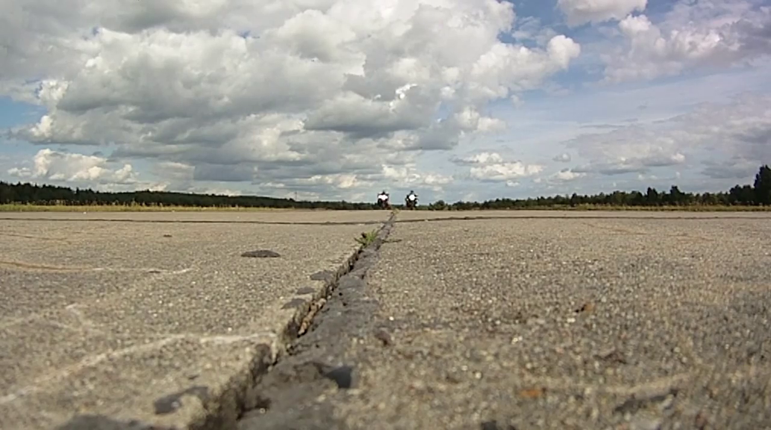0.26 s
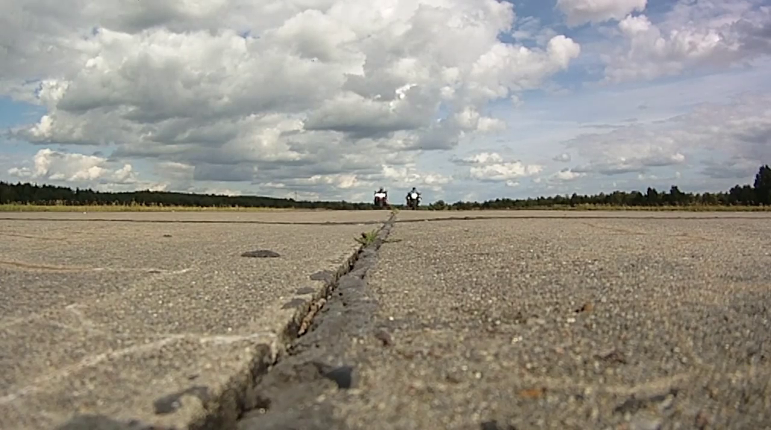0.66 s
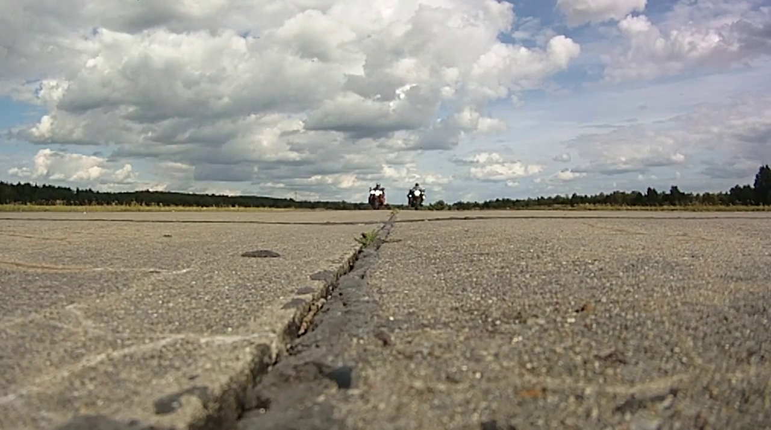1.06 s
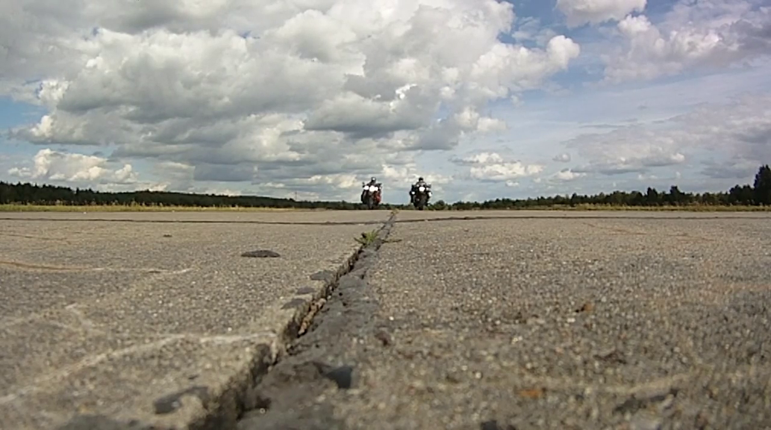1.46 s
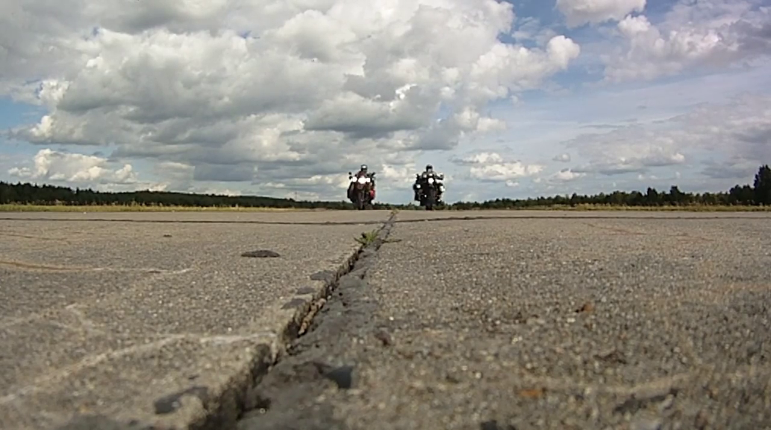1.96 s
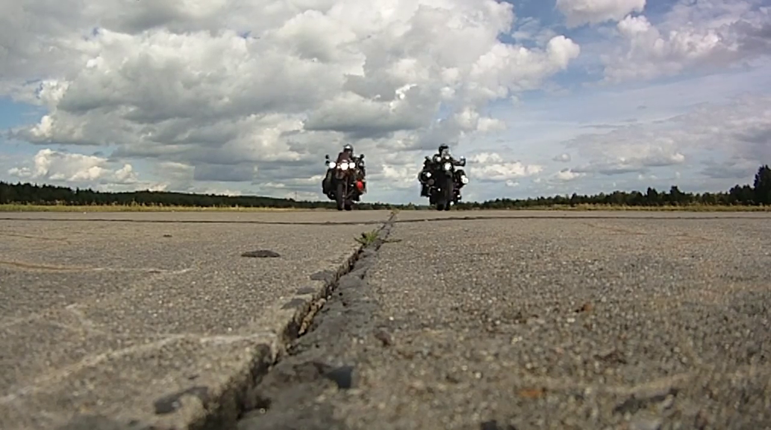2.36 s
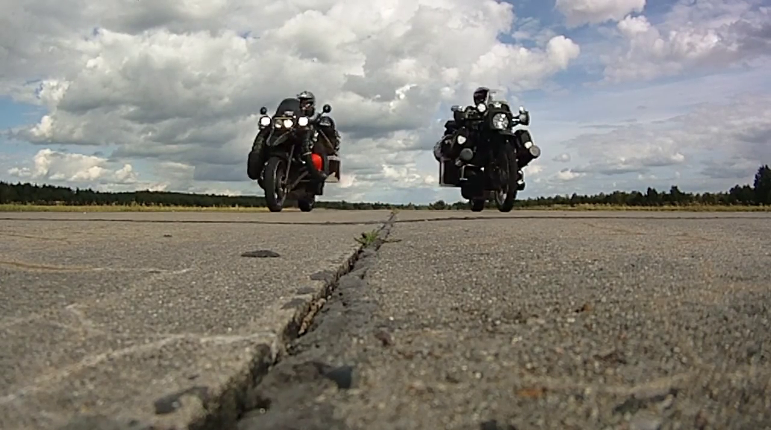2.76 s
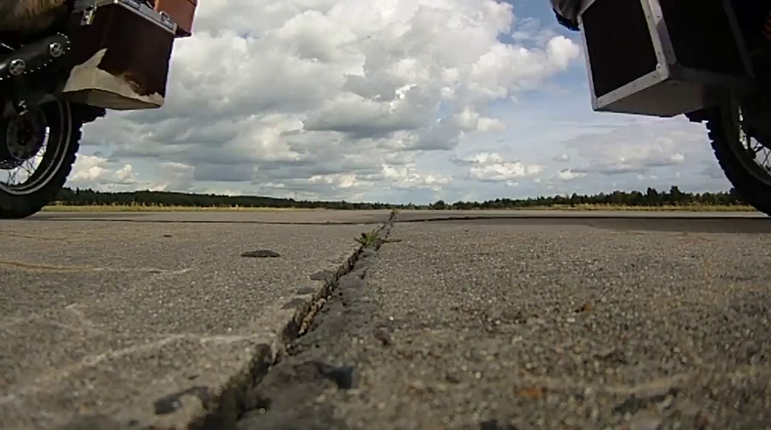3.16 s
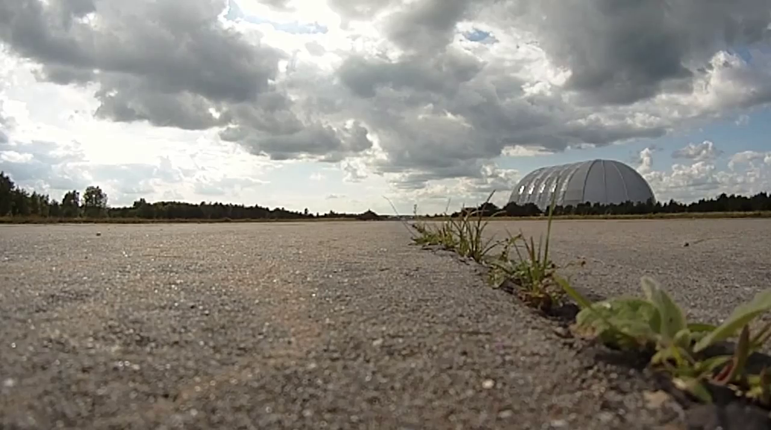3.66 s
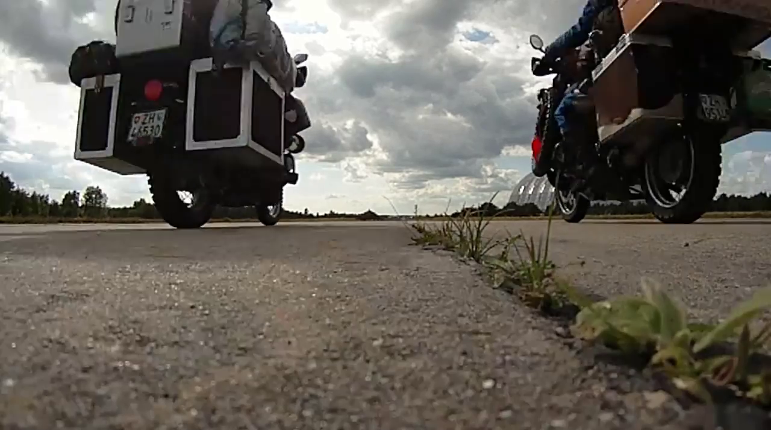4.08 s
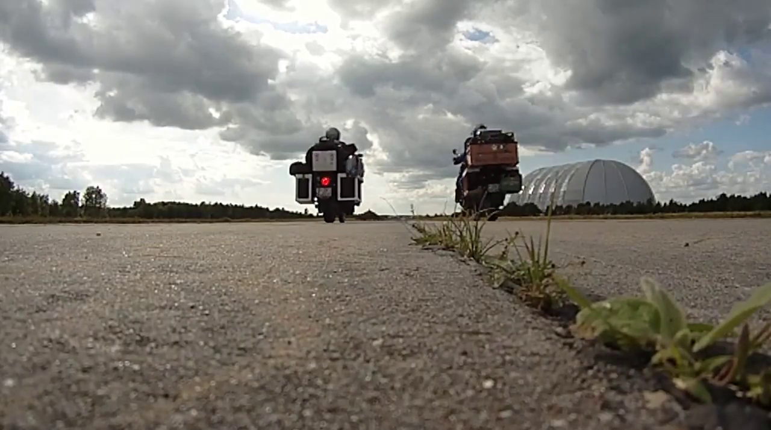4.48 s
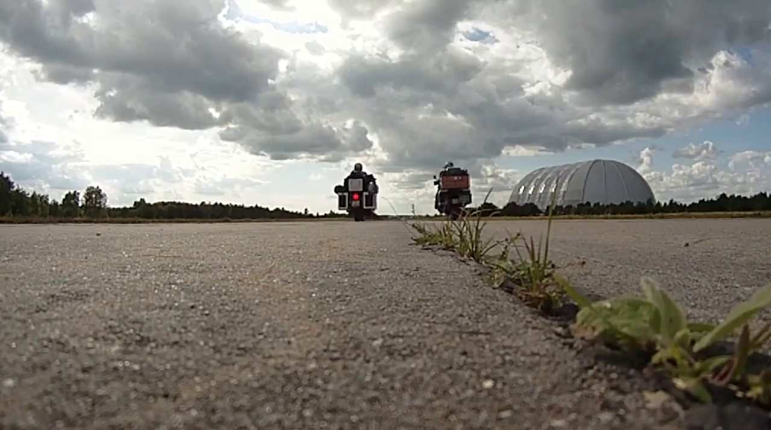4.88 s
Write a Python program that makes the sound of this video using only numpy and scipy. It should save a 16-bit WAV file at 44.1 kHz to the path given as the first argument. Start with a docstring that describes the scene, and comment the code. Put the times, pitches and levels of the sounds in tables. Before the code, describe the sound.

Dry open airfield, low microphone, almost mono. From 0 s two motorcycles hold a steady low hum, roughly 80 Hz at its strongest, slowly throbbing as the engines drift in and out of step, over dull tyre roar and soft wind rumble. Through 1-2.5 s it swells and brightens; tread rush, chain clatter and a few flicked stones emerge. Around 2.8-3.3 s the tyres sweep by with loud roar, crisp grit and falling pitch. At 3.5 s the tailpipes pass with hard exhaust beats that overload and duck the sound. At 3.63 s a small click and cut return to the close approach. The bikes pass again around 4.1 s, with wind gusts and side-to-side buffeting to 4.7 s. They recede lower in pitch with gas surges, raspy cracks, metallic chirps and irregular heavy pops, hardest near 4.7 s. A wavering gear whine rises from 4.8 s until the end, still riding away at 5.1 s.

```python
"""A beating engine hum and tyre roar swell up as two motorcycles ride in and pass the microphone.
After a cut the end of the approach comes again, facing the other way, and they ride off.
Distance sets level, dullness and Doppler shift; the two engines drift in and out of step, so their boom beats.
From the front: summed engine orders, noise for tyre roar, chain clatter and grit. From behind: gated exhaust
gas and blunt pressure beats, the hardest of which make a limiter duck."""
import sys
import numpy as np
from scipy import signal
from scipy.fft import rfft, irfft
from scipy.io import wavfile
from scipy.ndimage import uniform_filter1d

SR = 44100
rng = np.random.default_rng(int(sys.argv[2]) if len(sys.argv) > 2 else 0)


def materialize(psi):
    """Save the field psi as 16-bit PCM at rate SR to the path in sys.argv[1].

    A 1-D psi becomes a single channel; in a 2-D psi each row is a channel.
    """
    bounded = np.clip(np.atleast_2d(psi).T, -1, 1)
    quanta = np.round(bounded * 32767).astype(np.int16)
    wavfile.write(sys.argv[1], SR, quanta)


N = 225991
T = np.arange(N) / SR

# Throttle: time_s, leading engine rate_hz before Doppler
ENGINE_RATE = [(0, 39.4), (.7, 40.4), (2.1, 40.36), (3.05, 40.71), (3.52, 40.89), (4.48, 40.07),
               (4.58, 39.39), (4.95, 37.72), (5.12, 38.65)]
# Lag of the other engine: time_s, lag_cycles
ENGINE_SLIP = [(0, -1.52), (.41, -1.5), (.7, -1.44), (.94, -1.16), (1.47, -0.89), (1.69, -0.73),
               (2.39, -0.51), (2.8, -0.415), (3.1, -.25), (3.2, -0.29), (3.5, -0.035), (4.29, -0.026),
               (4.5, 0.52), (4.71, .74), (5.12, 1.54)]
# Low orders of both engines, close by: engine_order, leading_db, other_db,
# leading_change_alongside_db, other_change_alongside_db, roughness (0-1)
BOOM_ORDERS = [(2, -16.5, -15, -9, 1, 0.14), (3, -23, -26, 3.5, -4, 0.16)]
# Remaining orders against the hum level: engine_order, front_db, behind_db
HUM_ORDERS = [(1, -8, -24), (2.5, -9.5, -12), (4, -11.5, -8), (5, -0.5, 2.5), (6, -9.5, -8.5), (7, -2, -13),
              (8, -8.5, -19.5), (9, -14, -17), (10, -16, -11.5), (11, -22, -32)]
# Hardest exhaust beats, ahead of the limiter: time_s, spike_db
EXHAUST_BEATS = [(3.498, 9), (3.547, 8.5), (3.624, -4.5), (4.135, 4), (4.185, 6.5), (4.278, -4),
                 (4.329, 10), (4.417, 9.5), (4.492, 8.5), (4.513, -3), (4.676, 18.5), (4.806, 9.5),
                 (4.863, 11.5), (4.938, 6.5), (4.994, 10), (5.05, 11), (5.101, 14)]
# Surges and lulls of exhaust gas: time_s, half_length_s, change_db
GAS_SURGES = [(3.574, 0.069, 0.5), (4.272, 0.24, -3), (4.405, 0.031, 7), (4.592, 0.029, 6),
              (4.74, 0.075, 4), (4.96, 0.18, 2.5)]
# Click at the cut (the row at 3.63 s); every other row is a stone flicked by the tyres:
# start_s, level_db before the tick trim
BRIGHT_TICKS = [(2.798, -30), (2.895, -24), (2.942, -37), (2.99, -43), (3.04, -43), (3.63, -29),
                (3.699, -25)]
# Metal chirps from the bikes: centre_s, pitch_hz, peak_db
METAL_CHIRPS = [(3.608, 3720, -32), (4.122, 3700, -41), (4.271, 3700, -30.5), (4.375, 3760, -36.5),
                (4.481, 3760, -36), (4.58, 2700, -36), (4.606, 2630, -33), (4.749, 4220, -50),
                (4.857, 3890, -34), (4.924, 2740, -30.5), (4.988, 4200, -40), (5.016, 2520, -32)]
# Gear whine as they pull away: time_s, centre pitch_hz, centre level_db
GEAR_WHINE = [(4.55, 660, -60), (4.8, 685, -35), (4.92, 716, -25.5), (5.03, 738, -25.5), (5.12, 776, -27)]
# Gliding tones before the pitch ratio: pitch_hz, width_hz, relative level_db
GLIDING_TONES = [(995, 41, 4), (1171, 25, 3.5), (1282, 130, 3.5)]
# Gusts on the microphone: time_s, half_length_s, rumble_db, left_right_buffet_db
WIND_GUSTS = [(1.436, 0.48, -30.5, -88), (3.178, 0.046, -29, -77), (3.524, 0.02, -39, -38),
              (3.83, 0.055, -19, -65), (4.3, 0.067, -22, -27), (4.515, 0.045, -12.5, -37),
              (4.647, 0.03, -14, -27)]

# Noise colours, each scaled to rms 1 before its level: frequency_hz, density_db (per Hz)
# Low tyre roar: frequency_hz, density_db
ROAR_COLOUR = [(130, -9), (200, -7.5), (290, -7.5), (430, -11), (530, -6), (680, -13), (850, -21)]
# Bright rush of the tread: frequency_hz, density_db
RUSH_COLOUR = [(600, -2.5), (800, -1), (1000, -1), (1340, -1.5), (1560, -12), (1800, -12.5)]
# Chain clatter from ahead: frequency_hz, density_db
CLATTER_COLOUR = [(1500, -3.5), (1900, -6), (2400, -1.5), (3100, -13), (3700, -11), (4600, -25),
                  (5400, -54)]
# Chain clatter abreast and after the cut: frequency_hz, density_db
CLATTER_ABREAST_COLOUR = [(1500, 1.5), (1800, -7.5), (2500, -1.5), (3000, -8), (3600, -18), (4750, -12.5),
                          (5600, -27)]
# Grit under the tyres from ahead: frequency_hz, density_db
GRIT_COLOUR = [(4700, -3.5), (5700, -16), (6700, -4.5), (7300, -9), (8200, -3), (9100, -13.5),
               (10700, -5.5), (12100, -13), (14300, -7), (15500, -7.5)]
# Grit abreast and after the cut: frequency_hz, density_db
GRIT_ABREAST_COLOUR = [(5000, -11), (6300, -3), (8100, -2), (8900, -2.5), (10200, 0.5), (11200, -2.5),
                       (12800, -8), (15500, -13)]
# Body of the exhaust gas: frequency_hz, density_db
GAS_COLOUR = [(220, -3), (300, -4.5), (400, -4), (590, -10), (760, -10.5), (940, -12), (1300, -20.5),
              (1800, -32)]
# Rasp of the exhaust: frequency_hz, density_db
RASP_COLOUR = [(1900, 1), (2600, 4.5), (3100, -2), (3800, -1.5), (4800, -14.5), (5400, -7), (6400, -13.5),
               (8200, -6.5), (9200, -16.5), (14000, -13), (15500, -17)]
# Wind rumble shared by both channels: frequency_hz, density_db
AIR_COLOUR = [(25, -20), (37, 1), (48, -7), (70, -4), (120, -12), (200, -12.5), (400, -64)]
# Wind buffeting opposed in the two channels: frequency_hz, density_db
BUFFET_COLOUR = [(35, 2), (80, 12.5), (300, -9), (1000, -20), (3000, -28.5), (14000, -38.5)]
# Microphone hiss with a narrow peak: frequency_hz, density_db
HISS_COLOUR = [(1000, -13), (5000, 1.5), (7700, 0), (7890, 14), (8080, 0), (12000, -1.5), (14500, 0),
               (15500, -27)]

SPEED_M_S, PASS_S, ASIDE_M = 16.5, 3.45, 2.438  # PASS_S: tailpipes go by, in ride time
CUT_S, REPLAY_S = 3.63, .638  # the cut steps the ride back by REPLAY_S
FIRING_S = 3.547  # one firing of the leading engine
TYRES_AHEAD_M = 2.9  # tyres come abreast before the tailpipes
TYRES_SWING_M, PIPES_SWING_M = 1.4, 0.64  # stretch over which each turns past
TYRES_FADE_M = 0.65  # stretch over which the tyres fade once past
NEAR_M, NEAR_KNEE = 13.45, 8.2  # loudness levels off inside this range, this abruptly

ENGINE_LOSS_DB_PER_M = 0.0557
HUM_DB, HUM_FADE_DB_PER_M = -21, 0.62  # reference level; extra fading as they ride off
ROAR_DB, ROAR_LOSS_DB_PER_M = -21.5, 0.0655
RUSH_DB, RUSH_LOSS_DB_PER_M, RUSH_SHADE_DB = -21, 0.26, -2.5  # shade: behind the microphone
CLATTER_DB, CLATTER_LOSS_DB_PER_M = -32.5, 0.39
GRIT_DB, GRIT_REACH_M, GRIT_SHADE_DB = -42, 11.7, -7
GLIDE_START, GLIDE_SINK = .98, .22  # pitch ratio of the gliding tones, and its fall as the bikes go by
GAS_DB, RASP_DB = -20.5, -42
BREEZE_DB, WAKE_DB, WAKE_BUFFET_DB = -36, -29.5, -48.5
WHINE_ROUGH_DB = 3.5
FADE_IN_S = .015
ATTACK_S, RELEASE_S, TOP_HZ = .0003, 0.022, 15650  # limiter times, top of the passband


def undb(db):
    """Decibels to gain."""
    return 10 ** (np.asarray(db) / 20)


def unit(x):
    """Scale to rms 1."""
    return x / np.sqrt(np.mean(x ** 2))


def walk(rate_hz):
    """Smooth random drift of rms 1, from noise rolled off around rate_hz."""
    f = np.fft.rfftfreq(N, 1 / SR)
    return unit(irfft(rfft(rng.standard_normal(N)) * np.exp(-(f / rate_hz) ** 2), N))


def complex_walk(rate_hz):
    """Drift in both size and phase."""
    return walk(rate_hz) + 1j * walk(rate_hz)


def noise(spectrum, gate=1):
    """Optionally gated white noise, coloured with steep skirts outside the spectrum; rms 1."""
    hz, db = np.transpose(spectrum)
    f = np.fft.rfftfreq(N, 1 / SR) + 1
    skirts = np.minimum(1, np.minimum(f / hz[0], hz[-1] / f)) ** 6
    gain = undb(np.interp(np.log(f), np.log(hz), db)) * skirts
    return unit(irfft(rfft(rng.standard_normal(N) * gate) * gain, N))


def bump(s, half_s):
    """A bell-shaped swell around a moment."""
    return np.exp(-((T - s) / half_s) ** 2)


def ride_time(s):
    """Time along the ride, which steps back at the cut."""
    return s - REPLAY_S * (s > CUT_S)


def splice(control):
    """Soften the step of a control at the cut."""
    return uniform_filter1d(control, size=441)


def after_cut():
    """0 before the cut, 1 after it, when the microphone faces the other way."""
    return splice(1. * (T > CUT_S))


def curves(table):
    """Each column as a control along the ride; the stretch before the cut plays twice."""
    s, *columns = np.transpose(table)
    return [splice(np.interp(ride_time(T), ride_time(s), c)) for c in columns]


def gone_by(along, swing_m):
    """Near 0 before a point is reached, near 1 after it."""
    return .5 + .5 * np.tanh(along / (2 * swing_m))


def spreading(distance):
    """Gain of 1 / distance that levels off close by."""
    return (1 + (distance / NEAR_M) ** NEAR_KNEE) ** (-1 / NEAR_KNEE)


def wind(behind):
    """Breeze, wake of the bikes and gusts: shared rumble, and buffeting opposed left and right."""
    rumble = undb(BREEZE_DB) + undb(WAKE_DB) * behind
    buffet = undb(WAKE_BUFFET_DB) * behind + undb(-71.5)
    for s, half_s, rumble_db, buffet_db in WIND_GUSTS:
        rumble = rumble + undb(rumble_db) * bump(s, half_s)
        buffet = buffet + undb(buffet_db) * bump(s, half_s)
    return noise(AIR_COLOUR) * rumble, noise(BUFFET_COLOUR) * buffet


def small_parts():
    """Stones and the click at the cut as decaying bright noise, metal as short narrow chirps."""
    tick_s, tick_trim_db, chirp_s, chirp_width_hz = 0.0024, -10, 0.0041, 260
    ticks = sum(undb(db) * (T >= s) * np.exp(-abs(T - s) / tick_s) for s, db in BRIGHT_TICKS)
    bright = noise([(7000, -8), (9000, 3), (14000, 0), (16000, -2)])
    out = undb(tick_trim_db) * ticks * bright
    waver = walk(chirp_width_hz)
    for s, hz, db in METAL_CHIRPS:
        out = out + undb(db) * bump(s, chirp_s) * np.sin(2 * np.pi * hz * T + waver)
    return out


def gears():
    """Gear whine: a rising tone and its octave, wavering in pitch and rough in level."""
    octave_db, waver = -11, 0.0019  # waver: share of the pitch
    hz, db = curves(GEAR_WHINE)
    phase = 2 * np.pi * np.cumsum(hz * (1 + waver * walk(45))) / SR
    level = np.sqrt(2) * undb(db + WHINE_ROUGH_DB * walk(36)) * (T > GEAR_WHINE[0][0])
    return level * (np.sin(phase) + undb(octave_db) * np.sin(2 * phase))


def gliding_tones(swing):
    """Narrow drifting tones that sink in pitch as the bikes go by; rms 1."""
    travel = np.cumsum(GLIDE_START - GLIDE_SINK * swing) / SR
    tones = 0
    for hz, width_hz, db in GLIDING_TONES:
        carrier = np.exp(2j * np.pi * hz * travel)
        tones = tones + undb(db) * np.real(complex_walk(width_hz) * carrier)
    return unit(tones)


def tyres(turns, along, distance):
    """Front view: roar, tread rush and clatter pulsing with the engine, and crunching grit."""
    knock, glide_db, grain_db, grit_falloff = 0.12, -5, 4, 5.0
    swing, turned = gone_by(along + TYRES_AHEAD_M, TYRES_SWING_M), after_cut()
    knocks = np.cos(2 * np.pi * 5 * turns) + .7 * np.cos(2 * np.pi * 2.5 * turns)
    gate = np.exp(knock * knocks)
    off_axis = abs(swing - turned)

    roar = noise(ROAR_COLOUR, gate) * undb(ROAR_DB - ROAR_LOSS_DB_PER_M * distance)
    rush_db = RUSH_DB - RUSH_LOSS_DB_PER_M * distance + RUSH_SHADE_DB * off_axis
    rush = noise(RUSH_COLOUR, gate) + undb(glide_db) * gliding_tones(swing) * gate
    rush = rush * undb(rush_db)

    # the treble changes colour as the angle to the microphone swings round
    abreast = np.clip((1 - turned) * swing + turned, 0, 1)
    ahead, beside = np.sqrt(1 - abreast), np.sqrt(abreast)
    rattle = gate * undb(1.44 * walk(38))
    clatter = ahead * noise(CLATTER_COLOUR, rattle) + beside * noise(CLATTER_ABREAST_COLOUR, rattle)
    clatter = clatter * undb(CLATTER_DB - CLATTER_LOSS_DB_PER_M * distance)

    crunch = undb(grain_db * walk(3000) + 1.2 * walk(44.3))
    grit = ahead * noise(GRIT_COLOUR, crunch) + beside * noise(GRIT_ABREAST_COLOUR, crunch)
    grit = grit * undb(GRIT_DB + GRIT_SHADE_DB * off_axis)
    grit_reach = 1 / np.hypot(1, (distance / GRIT_REACH_M) ** grit_falloff)
    return (roar + rush + clatter) * spreading(distance) + grit * grit_reach


def tailpipes(turns, slip, beats):
    """Rear view: gas noise in surges, cracking once a cycle for each engine and on the hard beats."""
    crack, sharpness, other_share, other_lag = 1.74, 28, 0.23, 0.605  # lag in cycles
    flutter_db, rasp_surge = 1.95, 0.45  # rasp_surge: share of the gas surge in dB
    surge_db = sum(db * bump(s, half_s) for s, half_s, db in GAS_SURGES)
    leading = np.exp(sharpness * (np.cos(2 * np.pi * turns) - 1))
    other = np.exp(sharpness * (np.cos(2 * np.pi * (turns - other_lag - slip)) - 1))
    gate = 1 + crack * (leading + other_share * other) + abs(beats)
    gate = gate * undb(flutter_db * walk(51))
    gas = noise(GAS_COLOUR, gate) * undb(GAS_DB + surge_db)
    rasp = noise(RASP_COLOUR, gate) * undb(RASP_DB + rasp_surge * surge_db)
    return gas + rasp


def hard_beats():
    """Blunt exhaust beats: a swell of pressure, then a sharp suction spike."""
    width_s, swell, lead_s = 0.00087, 0.31, 0.0043
    out = 0
    for s, db in EXHAUST_BEATS:
        out = out + swell * bump(s - lead_s, 2 * width_s) - undb(db) * bump(s, width_s)
    return out


def crank(along, distance):
    """Doppler-shifted engine cycles, aligned so the same firing falls in step either side of the cut."""
    doppler = 1 / (1 + SPEED_M_S / 343 * along / distance)
    turns = np.cumsum(curves(ENGINE_RATE)[0] * doppler) / SR
    before, after = np.interp([FIRING_S, FIRING_S + REPLAY_S], T, turns)
    jump = (after - before + .5) % 1 - .5
    return turns - before - jump * after_cut()


def engines(turns, slip, along, behind):
    """Two bikes' boom orders beat; the remaining ones hum in loose phase, lining up into spikes from behind."""
    rough, lean, rear_db, alongside_m = 0.21, 0.44, 0.5, 8.8  # lean: phase in radians
    alongside = np.exp(-(along / alongside_m) ** 4)
    lines = []
    for order, lead_db, other_db, lead_by, other_by, spread in BOOM_ORDERS:
        leading = undb(lead_db + lead_by * alongside)
        other = undb(other_db + other_by * alongside)
        lines.append((order, leading + other * np.exp(-2j * np.pi * order * slip), spread))
    hum_db = HUM_DB - HUM_FADE_DB_PER_M * np.maximum(along, 0)
    for order, front_db, rear_order_db in HUM_ORDERS:
        size = undb(hum_db + front_db + (rear_order_db - front_db) * behind)
        lines.append((order, size, rough * max(1, order / 5)))

    out = 0
    for order, size, spread in lines:
        # no two firings are alike, so every order wavers in size and phase
        scatter = spread * complex_walk(14)
        # only orders above 2 start in loose phase
        offset = rng.uniform(-2.3, 2.12) * (order > 2) * (1 - behind) - lean
        tone = np.exp(1j * (2 * np.pi * order * turns + offset))
        out = out - np.real(size * (1 + scatter) * tone)
    return np.sqrt(2) * out * undb(rear_db * behind)


def scene():
    """Both bikes in mono over open ground; only buffeting and part of the hiss differ left and right."""
    along = splice(SPEED_M_S * (ride_time(T) - PASS_S))
    distance, behind = np.hypot(along, ASIDE_M), gone_by(along, PIPES_SWING_M)
    turns, slip, beats = crank(along, distance), curves(ENGINE_SLIP)[0], hard_beats()

    rumble, buffet = wind(behind)
    front = np.sqrt(1 - gone_by(along, TYRES_FADE_M)) * tyres(turns, along, distance)
    rear = np.sqrt(behind) * tailpipes(turns, slip, beats)
    hum = engines(turns, slip, along, behind) * spreading(distance)
    hum = hum * undb(-ENGINE_LOSS_DB_PER_M * distance)

    shared_hiss, side_hiss = undb(-62.5) * noise(HISS_COLOUR), undb(-72.5) * noise(HISS_COLOUR)
    mid = rumble + shared_hiss + small_parts() + gears() + front + rear + beats + hum
    side = buffet + side_hiss
    return np.array([mid + side, mid - side]) * np.minimum(T / FADE_IN_S, 1)


def record(dry):
    """A limiter ducks after each peak over full scale; what slips past is flattened, the top cut."""
    fall = T / RELEASE_S
    overshoot = np.log(np.maximum(abs(dry).max(axis=0), 1))
    held = np.maximum.accumulate(overshoot + fall) - fall
    pole = np.exp(-1 / (ATTACK_S * SR))
    reduction = signal.lfilter([1 - pole], [1, -pole], held)
    limited = dry * np.exp(-reduction)
    clipped = limited / (1 + limited ** 10) ** (1 / 10)
    low_pass = signal.ellip(12, .1, 90, TOP_HZ, fs=SR, output="sos")
    return signal.sosfilt(low_pass, clipped)


dry = scene()
out = record(dry)
materialize(out)
```